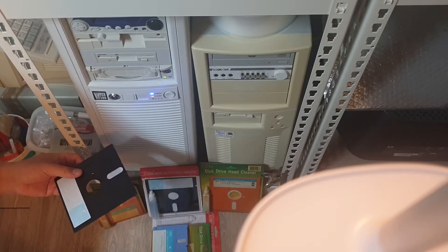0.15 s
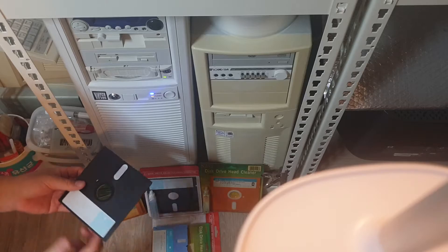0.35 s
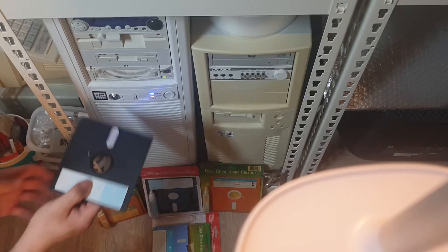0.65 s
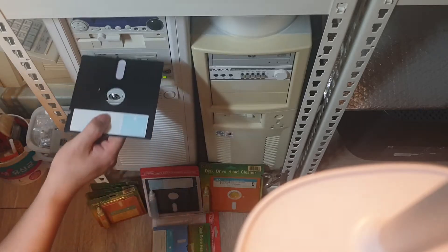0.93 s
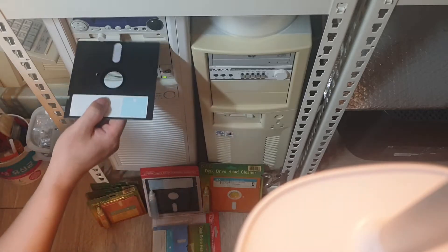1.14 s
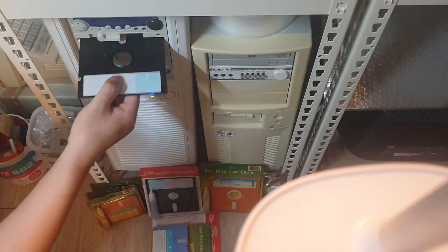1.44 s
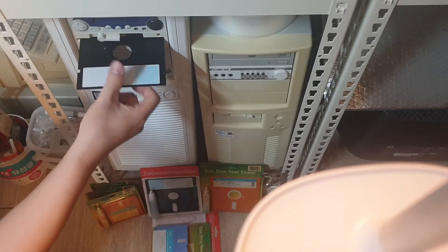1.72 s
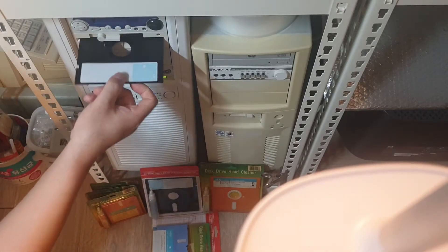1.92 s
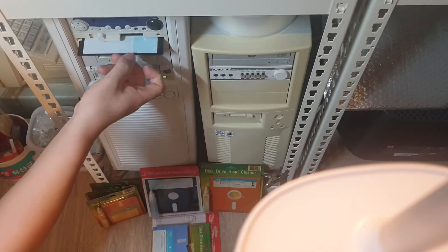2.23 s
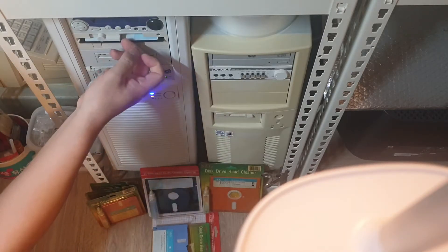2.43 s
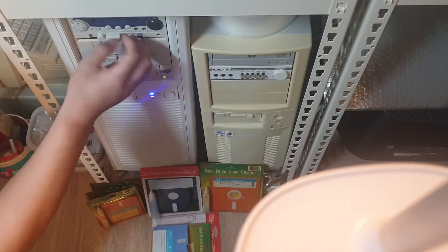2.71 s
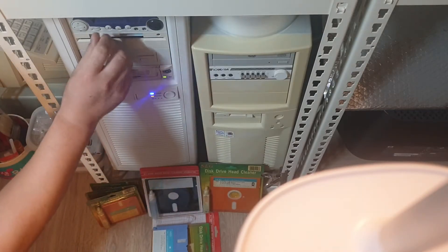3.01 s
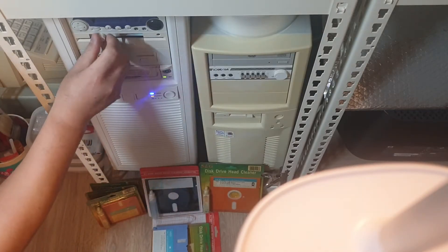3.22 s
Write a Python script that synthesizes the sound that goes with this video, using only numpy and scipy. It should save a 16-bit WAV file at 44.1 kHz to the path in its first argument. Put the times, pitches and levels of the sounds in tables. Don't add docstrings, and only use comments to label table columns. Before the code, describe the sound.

A floppy disk goes into a computer drive, close and slightly left, in a small room with low fan hum and faint hiss. Faint handling and a tick come before 0.6 s; from 1.15 s dry plastic rubs, scrapes and knocks, with a bright click cluster at 2.55. A motor hum and brushing whir start near 3.0; at 3.12 the loudest springy latch clack rings briefly, and whirring continues to the end.

```python
import sys
import numpy as np
from scipy import signal
from scipy.fft import rfft, irfft
from scipy.io import wavfile
from scipy.ndimage import uniform_filter1d

SR = 44100
rng = np.random.default_rng(int(sys.argv[2]) if len(sys.argv) > 2 else 0)


def persist_wave(psi):
    counts = np.round(np.clip(psi, -1, 1) * 32767).astype(np.int16)
    wavfile.write(sys.argv[1], SR, np.atleast_2d(counts).T)


def natural_amplitude(level_db):
    exponent = np.asarray(level_db, float) / 20
    return 10 ** exponent


N = 148176


def evened(x):
    return x / np.sqrt(np.mean(x ** 2) + 1e-20)


def read(points, hz):
    f, value = np.transpose(points)
    return np.interp(np.log(hz + 1), np.log(f + 1), value)


def add(mix, s, sound):
    part = mix[round(s * SR):][:len(sound)]
    part += sound[:len(part)]


def colour(x, points):
    return evened(irfft(rfft(x) * natural_amplitude(read(points, np.fft.rfftfreq(N, 1 / SR))), N))


def fuzzy(hz, width_hz):
    z = rng.standard_normal(N) + 1j * rng.standard_normal(N)
    pole = np.exp(-np.pi * width_hz / SR)
    for _ in range(2):
        z = signal.lfilter([1], [1, -pole], z)
    size = abs(z)
    carrier = np.exp(2j * np.pi * hz * np.arange(N) / SR)
    return evened((evened(size) ** 0.5 * z / size * carrier).real)


def ring(modes, factor, rise_s):
    hz, db, t60 = np.transpose(modes)[:, :, None]
    t = np.arange(5000) / SR
    tones = natural_amplitude(db - 60 * t / t60) * np.sin(2 * np.pi * hz * factor * t)
    return tones.sum(0) * np.minimum(t / rise_s, 1)


def alike(a, b, likeness):
    same = np.clip(likeness, -1, 1)[:, None]
    return np.array([a, same * a + np.sqrt(1 - same ** 2) * b])


def grains(spread_db):
    slips_per_s = 5100
    size = natural_amplitude(spread_db * np.minimum(rng.exponential(1, N), 4))
    size = size * (rng.random(N) < slips_per_s / SR)
    return size * rng.standard_normal(N) + 0.5 * rng.standard_normal(N)


def stroke_db(start, rise, fall):
    u = np.arange(N) / SR - start
    times = [0, rise, rise + fall, rise + 3 * fall]
    return np.interp(u, times, [-12.5, 0, -19.5, -90], left=-120)


def rubs():
    # start/s, rise/s, fall/s, peak level/dB, sheen level/dB
    strokes = [(.2, 0.053, 0.21, -75, -2.5), (0.399, 0.1, 0.12, -66.5, 0.5), (1.0, 0.057, 0.068, -74, 6.5),
               (1.162, 0.0047, 0.15, -62.5, -3), (1.311, 0.022, 0.11, -59.5, -12),
               (1.391, 0.013, 0.13, -58, -8), (1.45, 0.028, 0.19, -59.5, -1.5),
               (1.55, 0.0086, 0.063, -61.5, -11), (1.6, 0.089, 0.024, -61.5, -27),
               (1.902, 0.012, 0.26, -62.5, 0.5), (1.93, 0.015, 0.086, -58, -19),
               (1.98, 0.092, 0.17, -60.5, -1.5), (2.12, 0.095, 0.036, -64.5, -6),
               (2.24, 0.069, 0.27, -63, -4), (2.472, 0.055, 0.19, -63.5, -8),
               (2.66, 0.021, 0.071, -62, -12), (2.799, 0.0018, 0.15, -69.5, -9),
               (2.92, 0.0088, 0.031, -61.5, -19), (2.963, 0.059, 0.065, -56.5, -2)]
    # f/Hz, level/dB per Hz
    jacket_colour = [(700, -5), (1500, -9), (2200, -8.5), (3500, -18.5), (5600, -4.5), (7500, -5.5),
                     (9000, -18), (11000, -44)]
    # f/Hz, level/dB per Hz
    sheen_colour = [(6000, -20), (9500, -3.5), (11500, 3), (14000, -5.5), (16000, -3)]
    low, high = np.zeros(N), np.zeros(N)
    for start, rise, fall, db, sheen_db in strokes:
        shape = db + stroke_db(start, rise, fall)
        low += natural_amplitude(2 * shape)
        high += natural_amplitude(2 * (shape + sheen_db))
    body = np.sqrt(low) * colour(grains(4.2), jacket_colour)
    return body + np.sqrt(high) * colour(grains(5.9), sheen_colour)


def scrapes():
    # start/s, rise/s, fall/s, peak level/dB
    drags = [
        (.47, .025, .04, -97),
        (1.165, 0.0064, 0.15, -66),
        (1.41, 0.029, .05, -66),
        (1.46, 0.017, .1, -60),
        (1.54, .02, 0.055, -74),
        (1.68, 0.022, 0.07, -75),
        (1.92, 0.038, 0.08, -65),
        (2.27, 0.027, 0.14, -77),
        (2.8, 0.0073, 0.11, -74),
        (2.92, 0.032, 0.046, -69.5),
    ]
    # f/Hz, level/dB per Hz
    edge_colour = [(600, -5), (1200, 8), (2500, -9), (3300, 4), (4400, 5.5), (5500, -11), (8000, -24)]
    power = np.zeros(N)
    for start, rise, fall, db in drags:
        power += natural_amplitude(2 * (db + stroke_db(start, rise, fall)))
    return np.sqrt(power) * colour(grains(3.0), edge_colour)


def patchy(x):
    z = signal.stft(x, nperseg=256)[2]
    patches = uniform_filter1d(rng.standard_normal(z.shape), size=8, axis=0)
    patches = evened(uniform_filter1d(patches, size=10, axis=1))
    return signal.istft(z * natural_amplitude(1.6 * patches), nperseg=256)[1][:N]


def knock(tick_db, tick_hz, body_db, factor, crack_db=-1):
    # f/Hz, level/dB
    case_colour = [(150, -43), (400, -9.5), (700, 0), (1000, 3), (1700, 0.5), (2400, -0.5), (4500, -11.5),
                   (12000, -33)]
    tick_s, crack_s, rattle_s = 0.00063, 0.0029, 0.014
    t = np.arange(4096) / SR
    noise = rng.standard_normal((2, len(t)))
    puff = (t / tick_s * np.exp(1 - t / tick_s)) ** 3.6
    crack = signal.lfilter(*signal.butter(1, [4000.0, 16000.0], "band", fs=SR), noise[0])
    crack = crack * np.exp(-t / crack_s) * np.minimum(t / 0.00028, 1)
    tick = puff * np.sin(2 * np.pi * tick_hz * t) + natural_amplitude(crack_db) * crack
    flat = rfft(noise[1])
    flat = flat / abs(flat)
    case = evened(irfft(flat * natural_amplitude(read(case_colour, np.fft.rfftfreq(len(t), 1 / SR) / factor))))
    case = case * np.exp(-t / rattle_s) * np.minimum(t / 0.0026, 1)
    return natural_amplitude(tick_db) * tick + natural_amplitude(body_db - 4.5) * case


def knocks():
    # t/s, tick level/dB, tick f/Hz, body level/dB, body pitch factor
    case_hits = [(0.4939, -46, 6200, -84, 0.77), (1.1656, -50, 5300, -43, 0.66),
                 (1.188, -79, 6000, -43, 0.39), (1.2089, -76, 5900, -55, 0.96),
                 (1.3162, -54.5, 6440, -58, 0.7), (1.486, -40, 8470, -48.5, 1.22),
                 (1.559, -48.5, 6030, -46.5, 0.46), (1.687, -58, 5700, -57, 0.42),
                 (1.9086, -55, 7800, -75, 1.1), (1.97, -63, 6000, -62, 1.3),
                 (2.285, -67, 6000, -50.5, 0.44), (2.46, -83, 6000, -51.5, 0.69),
                 (2.345, -38.5, 5730, -44, 1.8), (2.5431, -39.5, 6420, -37.5, 1.82),
                 (2.5445, -31, 6880, -45, 0.81), (2.556, -32.5, 7240, -54, 1.3),
                 (2.669, -60, 5050, -46.5, 0.69), (2.8, -56.5, 5500, -50.5, 0.66),
                 (2.9756, -66, 6860, -47, 0.84), (2.9966, -46.5, 6360, -39.5, 1.33)]
    # t/s, level/dB, f/Hz
    small_ticks = [(1.254, -53, 6350), (1.342, -54, 6060), (1.395, -51, 5600), (1.813, -78, 2000),
                   (1.915, -63, 6500), (2.279, -70, 6000), (2.5495, -44, 6800), (2.5538, -37.5, 7260),
                   (2.561, -44, 6950), (2.566, -45, 6800), (2.572, -43, 7700), (2.9255, -58, 7960),
                   (2.933, -58, 7460), (2.982, -55, 7100), (3.002, -53, 6000)]
    # f/Hz, level/dB, t60/s
    flap_modes = [(476, -45, 0.043), (779, -42, 0.076), (642, -47.5, 0.052), (335.5, -46.5, 0.1)]
    # f/Hz, level/dB, t60/s
    seat_modes = [(563, -48, 0.083), (623, -51.5, 0.066)]
    out = np.zeros(N)
    for s, *settings in case_hits:
        add(out, s, knock(*settings))
    for s, db, hz in small_ticks:
        add(out, s, knock(db, hz, -120, 1))
    add(out, 1.182, ring(flap_modes, 1, 0.0063))
    add(out, 2.799, ring(seat_modes, 1, 0.0039))
    return out


def latch():
    # t/s, tick level/dB, tick f/Hz, body level/dB, body pitch factor
    strikes = [
        (3.1203, -7.5, 7854, -30.5, 0.79),
        (3.1222, -24.5, 8180, -41, 2),
        (3.129, -26, 7670, -42, 0.7),
        (3.156, -45, 7600, -38.5, 0.56),
    ]
    # f/Hz, level/dB, t60/s
    spring_modes = [(680, -16, 0.18), (954, -11.5, 0.043), (998, 3.5, 0.035), (1298, -2, .06),
                    (1644, 2.5, 0.046), (2238, 1.5, 0.043), (2480, 1, 0.029), (4274, 3, 0.041),
                    (4785, 10, 0.027), (7900, -10, 0.087), (8290, -12, 0.06), (9900, -2, 0.02),
                    (9900, 4, 0.075), (13700, -18, 0.042)]
    snap_s, thud_s = 0.0004, 0.035
    out, t = np.zeros(N), np.arange(8000) / SR
    for s, *settings in strikes:
        add(out, s, knock(*settings, crack_db=-8))
    shut_s = strikes[0][0]
    snap = signal.lfilter(*signal.butter(2, 4000, "high", fs=SR), rng.standard_normal(8000))
    snap = snap * t / snap_s * np.exp(1 - t / snap_s) ** 2
    add(out, shut_s - 0.0002, natural_amplitude(-20) * snap)
    add(out, shut_s + 0.00095, natural_amplitude(-33.5) * ring(spring_modes, 0.99, 0.0014))
    thud = t / thud_s * np.exp(1 - t / thud_s) * fuzzy(163.7, 97)[:8000]
    add(out, shut_s, natural_amplitude(-54.5) * thud)
    return out


def whir():
    # t/s, level/dB
    spin_level = [
        (2.98, -73),
        (3.0, -59),
        (3.06, -52),
        (3.12, -53),
        (3.22, -52),
        (3.36, -56),
    ]
    # f/Hz, level/dB per Hz
    liner_colour = [(200, -17), (500, -13), (1200, -17), (2500, -26), (4000, -20.5), (6500, -13.5),
                    (9000, -22), (15500, -22.5)]
    level_db = np.interp(np.arange(N) / SR, *np.transpose(spin_level), left=-120)
    return natural_amplitude(level_db) * colour(grains(1.0), liner_colour)


def spindle():
    # f/Hz, width/Hz, level/dB
    motor_tones = [(134, 4.6, -16.5), (266.7, 86, -21), (370.6, 65, -18), (525, 31, -3.5), (615, 40, -9.5),
                   (685, 40, -9), (1350, 16, -17.5), (3020, 81, -10)]
    start_s, rise_s = 2.98, 0.066
    hum = sum(natural_amplitude(db) * fuzzy(hz, width) for hz, width, db in motor_tones)
    return natural_amplitude(-50.5) * np.clip((np.arange(N) / SR - start_s) / rise_s, 0, 1) * hum


def panels(x):
    decay_s = 0.008
    taps = np.zeros((2, 1000))
    at = rng.integers(50, 1000, (2, 90))
    echoes = rng.choice([-1.0, 1.0], at.shape) * np.exp(-at / SR / decay_s)
    np.put_along_axis(taps, at, echoes, 1)
    taps = signal.lfilter(*signal.butter(2, 900.0, "high", fs=SR), taps)
    taps = taps / np.linalg.norm(taps, axis=1)[:, None]
    return signal.fftconvolve(x[None], taps, axes=1)[:, :N]


def room(x):
    # f/Hz, t60/s
    decay = [(200, 0.85), (700, 0.28), (2000, 0.3), (5000, 0.17), (10000, 0.19), (15000, 0.14)]
    # f/Hz, level/dB
    tail_colour = [(200, -3), (1000, 3.5), (3000, 0), (6000, 2.5), (8000, -4), (14000, 1.5)]
    # f/Hz, left-right likeness
    tail_likeness = [(100, 0.82), (300, 0.83), (700, 0.4), (1500, 0.083), (4000, 0.033)]
    taps = np.zeros((2, 22000))
    at = np.arange(120, 21980, 12) + rng.integers(0, 12, (2, 1822))
    np.put_along_axis(taps, at, rng.choice([-1.0, 1.0], at.shape), 1)
    hz, t, z = signal.stft(taps, SR, nperseg=128)
    z = alike(z[0], z[1], read(tail_likeness, hz))
    z = z * natural_amplitude(-60 * t / read(decay, hz)[:, None])
    tail = signal.istft(z, SR, nperseg=128)[1]
    tone = natural_amplitude(read(tail_colour, np.fft.rfftfreq(32768, 1 / SR)))
    tail = irfft(rfft(tail, 32768) * tone)[:, :22000]
    tail[:, :120] = 0
    tail = tail / np.linalg.norm(tail[0])
    return signal.fftconvolve(x[None], tail, axes=1)[:, :N]


def fans():
    # f/Hz, level/dB per Hz
    air_colour = [(24, -52), (40, -9), (245, -7.5), (340, -20.5), (571, -14), (1040, -23.5), (1710, -28),
                  (4000, -44.5), (5200, -84), (8800, -120)]
    # f/Hz, left-right likeness
    air_likeness = [(60, 0.87), (240, 0.79), (500, 0.68), (950, 0.43), (3770, 0.14)]
    # f/Hz, level/dB rms
    blades = [(55, -81.5), (102.3, -67), (145, -83), (185, -67), (236.9, -68.5), (403.7, -81), (515, -74.5),
              (559.9, -70.5), (680, -75.5), (11375, -94)]
    # f/Hz, level/dB
    motor_lines = [(560.5, -69), (241.6, -73), (101.7, -72), (400, -79), (11375, -92)]
    # t/s, level/dB
    sway = [(0.0, -54.5), (0.14, -58.5), (0.93, -62.5), (1.06, -60), (1.44, -58.5), (1.74, -56),
            (1.94, -64), (2.12, -64.5), (2.28, -61), (3.13, -62.5), (3.36, -61.5)]
    frames, hz = N // 256 + 5, np.fft.rfftfreq(1024, 1 / SR)
    a, b, c, d, patches = rng.standard_normal((frames, 513, 5)).T
    patches = uniform_filter1d(patches, size=8, axis=0)
    patches = evened(uniform_filter1d(patches, size=14, axis=1))
    z = alike(a + 1j * b, c + 1j * d, read(air_likeness, hz))
    z = z * natural_amplitude(read(air_colour, hz)[:, None] + 0.5 * patches)
    air = natural_amplitude(-59) * evened(signal.istft(z, nperseg=1024, noverlap=768)[1][:, :N])
    t = np.arange(N) / SR
    for f, db in blades:
        air = air + natural_amplitude(db) * fuzzy(f, 8.1)
    for f, db in motor_lines:
        air = air + natural_amplitude(db + 2) * np.sin(2 * np.pi * (f * t + rng.random()))
    sway_db = np.interp(t, *np.transpose(sway))
    low = signal.sosfiltfilt(signal.butter(2, 260, fs=SR, output="sos"), air)
    return air + low * (natural_amplitude(sway_db - sway_db.mean()) - 1)


def scene():
    hits = latch() + knocks()
    soft = patchy(rubs() + scrapes()) + whir()
    near = hits + natural_amplitude(-4) * soft + panels(natural_amplitude(-8) * hits + natural_amplitude(-1) * soft)
    near = near * natural_amplitude([[2], [-2]])
    far = room(natural_amplitude(1) * hits + natural_amplitude(1) * soft)
    mix = near + far + fans() + spindle()
    left = np.pad(mix[0], (0, 3), "edge")[3:]
    right = np.pad(mix[1], (3, 0), "edge")[:N]
    return np.array([left, right])


def roll_off(x):
    return signal.sosfilt(signal.butter(12, 16850, fs=SR, output="sos"), x)


def record(dry):
    # f/Hz, level/dB per Hz
    hiss_colour = [(1500, -4), (3000, -7.5), (5000, -5), (8500, -13), (10500, -9.5), (12000, -2.5),
                   (15500, -3.5)]
    hiss = natural_amplitude(-77) * np.array([colour(rng.standard_normal(N), hiss_colour) for _ in dry])
    cut = signal.lfilter(*signal.butter(4, 42.0, "high", fs=SR), dry + hiss)
    cut = signal.sosfilt(signal.ellip(8, 0.5, 50, 15900, fs=SR, output="sos"), cut)
    return roll_off(cut)


dry = scene()
out = record(dry)
persist_wave(out)
```